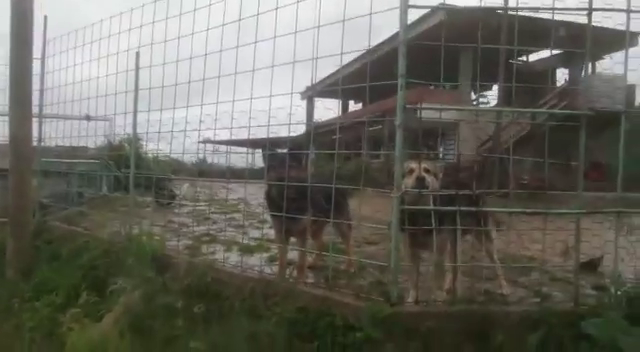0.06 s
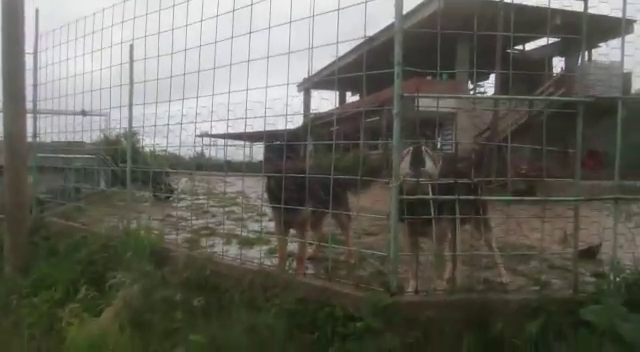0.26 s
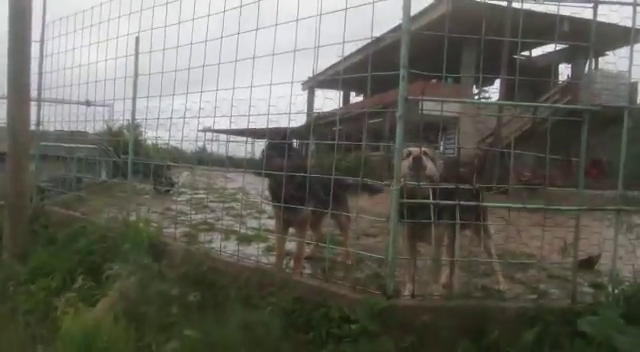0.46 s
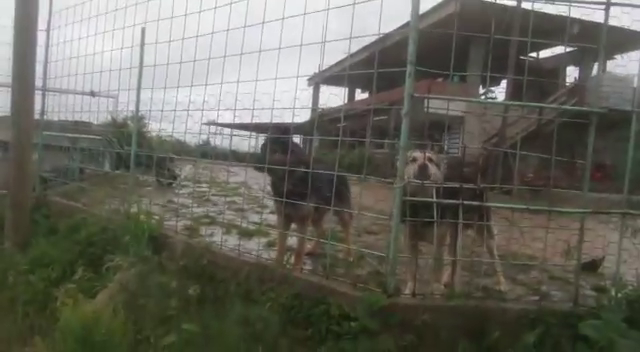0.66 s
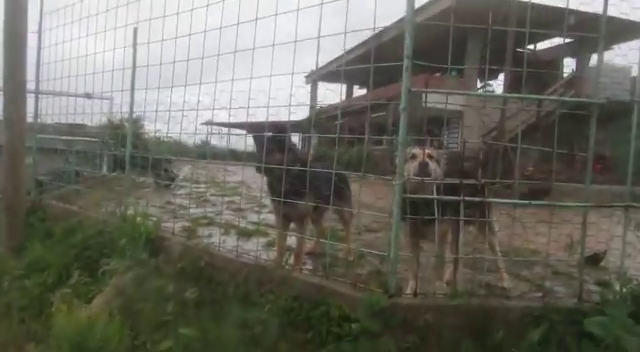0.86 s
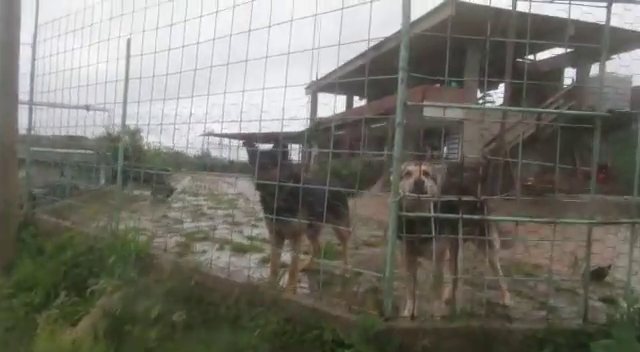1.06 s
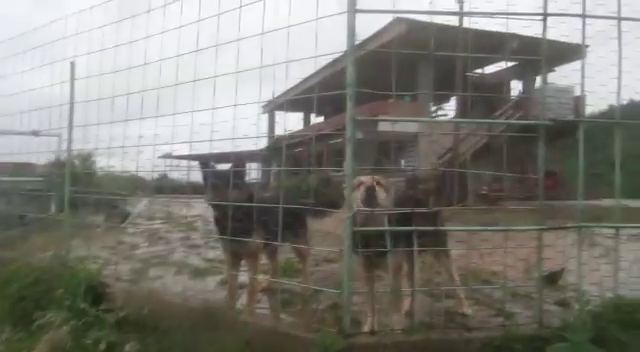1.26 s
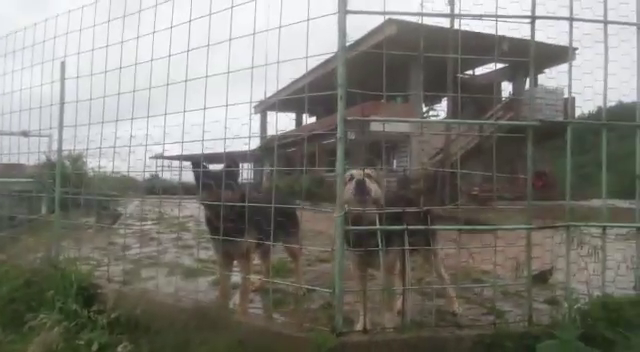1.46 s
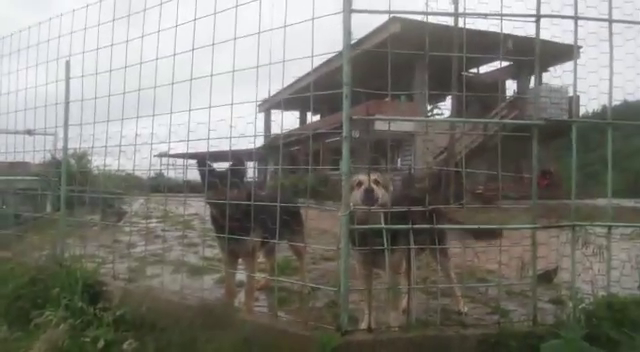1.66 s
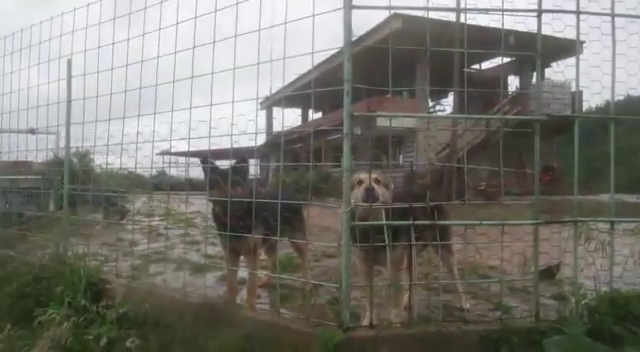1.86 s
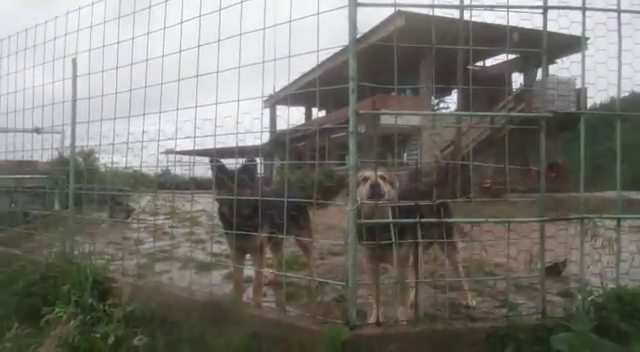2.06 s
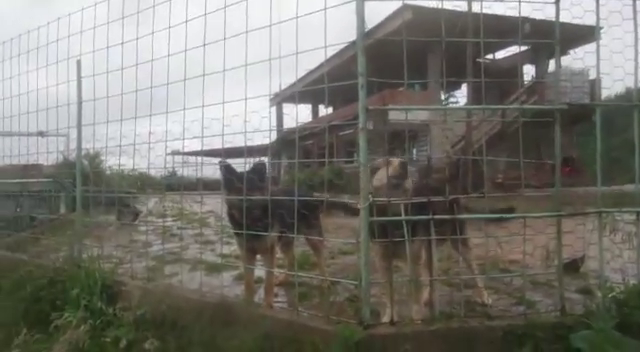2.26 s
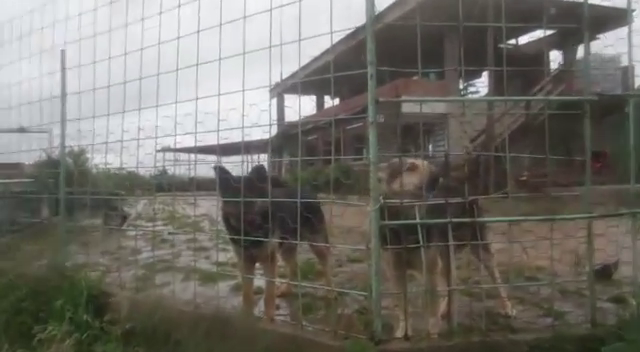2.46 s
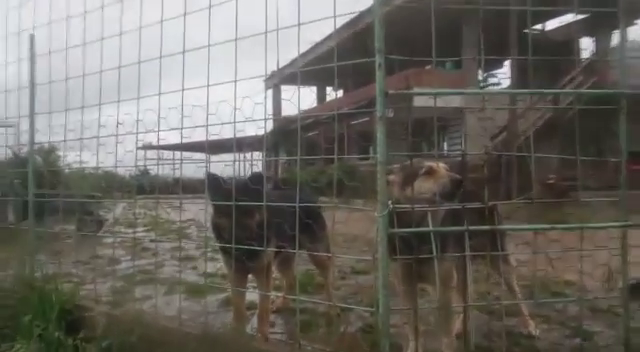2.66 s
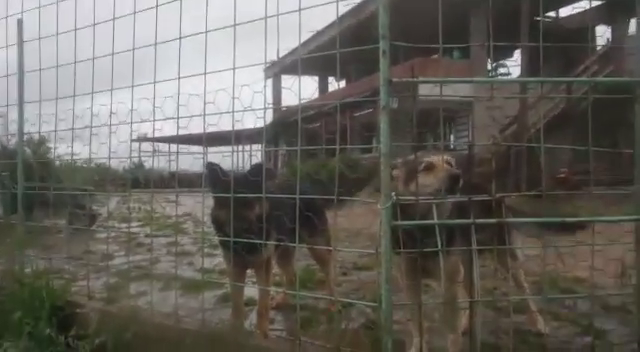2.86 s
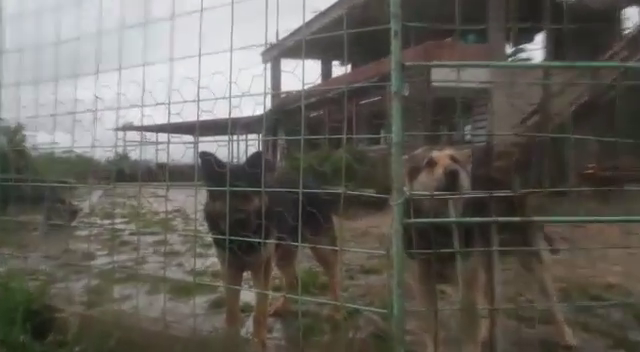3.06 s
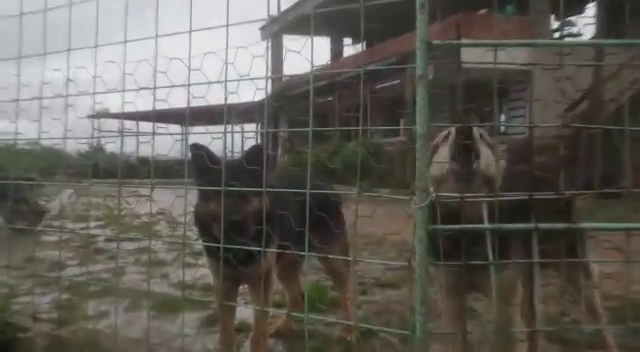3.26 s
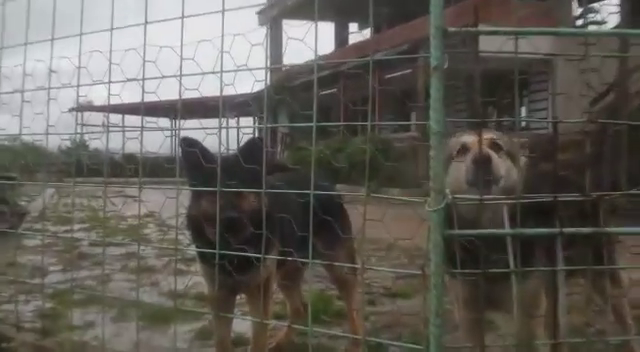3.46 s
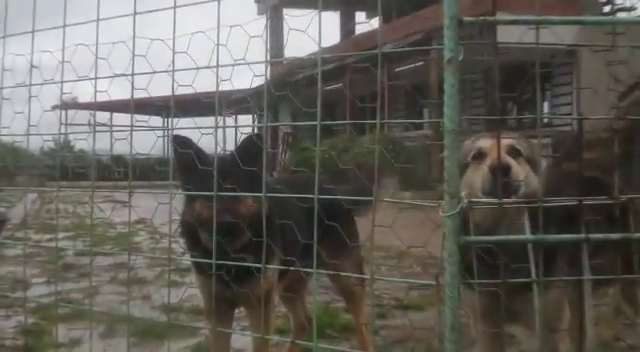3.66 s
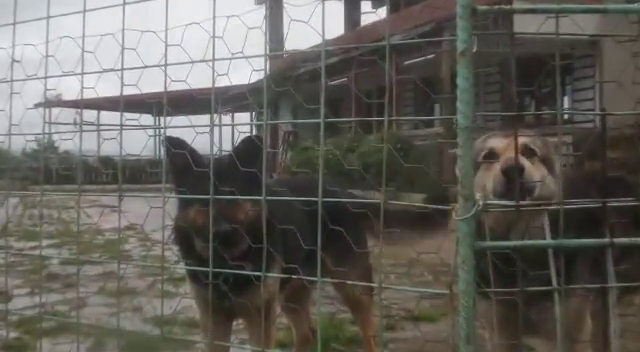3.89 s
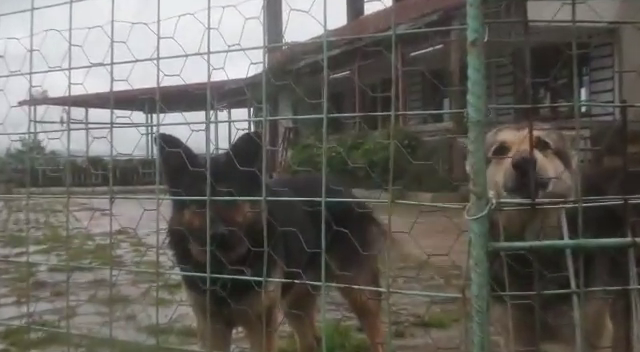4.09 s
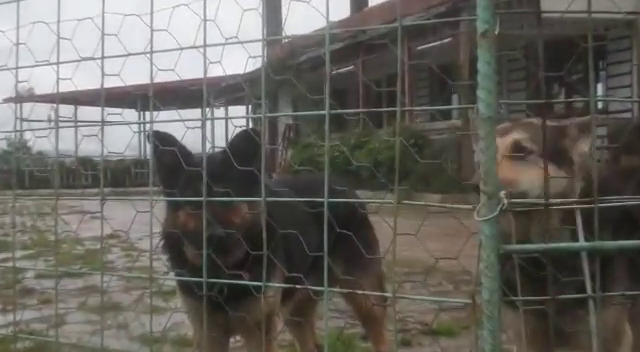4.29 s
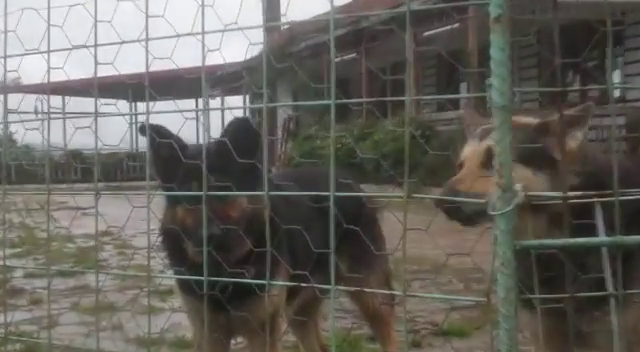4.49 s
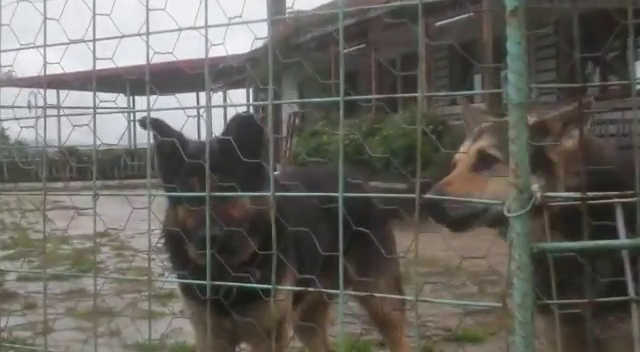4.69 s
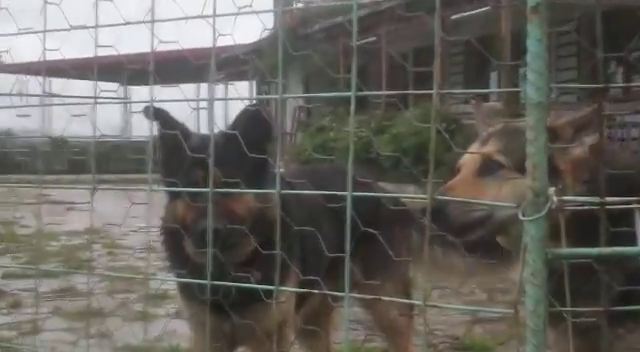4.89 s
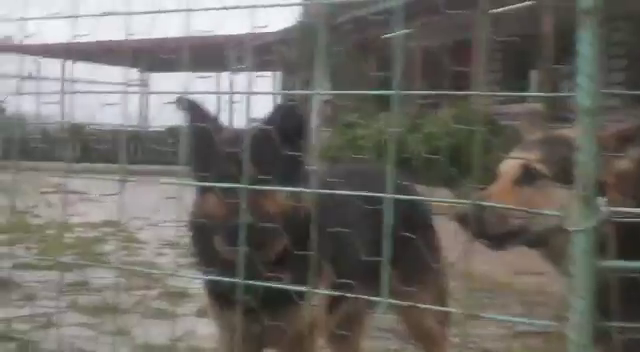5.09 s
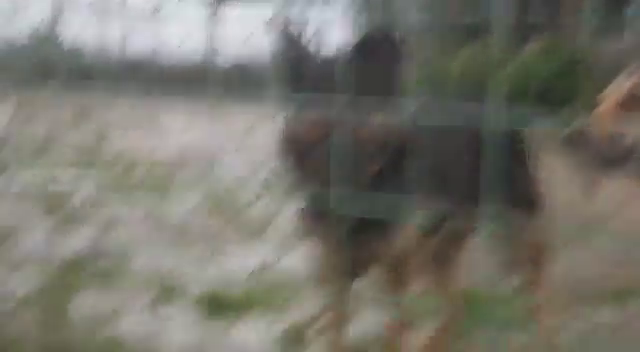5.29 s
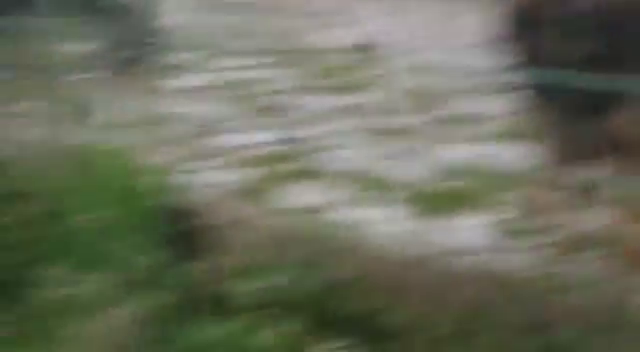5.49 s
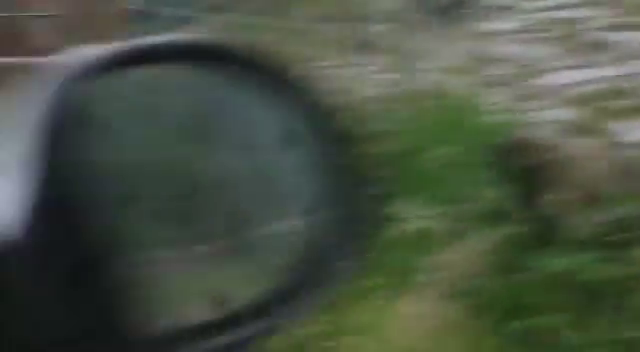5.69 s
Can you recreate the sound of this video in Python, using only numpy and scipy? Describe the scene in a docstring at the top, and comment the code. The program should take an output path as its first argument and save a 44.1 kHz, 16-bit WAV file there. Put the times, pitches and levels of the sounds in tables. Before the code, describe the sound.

A handheld microphone in an open yard catches four isolated hoarse barks from one large dog, loud enough to make the limiter duck. A much quieter diesel rises and falls twice between and beneath them. Then the barking stops, the engine idle grows slightly closer and hissier, a tiny hollow blip sounds, and low wind buffets arrive before a sharp click at the end. The image begins wide and turns mono.

```python
"""A large dog behind a wire fence barks four times: fold tones, ragged throat rings and breath noise; the yard echoes.
Close by a diesel engine idles, is revved twice with thin turbo and belt whistles, and settles to idle as the
listener nears it: sines for its low orders, noise throbbing with the firings for exhaust and hiss.
Small ticks (struck resonances), a hollow blip and wind (lumpy low noise, late gusts) reach the handheld
stereo microphone; its limiter ducks loud peaks and the image folds to mono partway."""
import sys
import numpy as np
from scipy import signal
from scipy.fft import rfft, irfft
from scipy.io import wavfile
from scipy.ndimage import uniform_filter1d

SR = 44100
rng = np.random.default_rng(int(sys.argv[2]) if len(sys.argv) > 2 else 0)


def ratio_of_db(decibels):
    """Turn decibels (scalar or array-like) into linear amplitude factors; 0 dB maps to 1."""
    return 10 ** (np.asarray(decibels, float) / 20)


def dump(signal):
    """Clip the signal to [-1, 1] and save it as 16-bit WAV at the path in sys.argv[1]."""
    limited = np.clip(np.atleast_2d(signal).T, -1, 1)
    pcm = np.round(limited * 32767).astype(np.int16)
    wavfile.write(sys.argv[1], SR, pcm)


N = 253134   # length in samples

# Wind rumble on the microphone: t/s, level/dB
WIND_RUMBLE = [(0, -65), (4.2, -59.5), (4.8, -63), (5.74, -58)]
# Gusts on the microphone: centre t/s, length/s, level/dB
WIND_GUSTS = [(4.932, 0.11, -44.5), (5.15, 0.12, -33.5), (5.3, .1, -34), (5.391, 0.081, -34),
              (5.64, 0.05, -49)]
# Likeness of diffuse sound at left and right: f/Hz, likeness/0-1
LEFT_RIGHT_LIKENESS = [(60, 0.6), (300, 0.86), (1000, 0), (4000, 0), (15000, 0)]
# Small ticks: t/s, burst peak/dB, burst f/Hz, burst t60/s, left over right/dB, knock peak/dB
SMALL_TICKS = [(0.0573, -31, 8000, 0.064, -9, -33.5), (1.046, -36.5, 7480, 0.015, 12, -51),
               (1.1143, -16.5, 8180, 0.0046, 19, -54), (1.2107, -38, 7700, .012, 9, -60),
               (1.995, -45, 8990, 0.023, 29, -41), (2.607, -42, 8200, 0.0087, 0, -65),
               (3.1471, -51, 9170, 0.011, 10, -48), (5.7128, -16, 9937, 0.0046, 23, -16.5)]
# One short hollow blip: t/s, level at onset/dB, f/Hz, t60/s
HOLLOW_BLIP = (4.685, -34, 775, .06)
# Engine speed and loudness: t/s, firing rate/Hz, level/dB
ENGINE_RUN = [(0.0, 25.4, -54.5), (0.46, 33, -50), (0.59, 32.51, -40), (0.67, 37.4, -47), (0.72, 47.7, -46),
              (0.8, 54.4, -43.5), (0.94, 71.2, -39.5), (1.0, 75, -40.5), (1.25, 65.4, -41), (1.58, 52, -44),
              (1.76, 45.4, -52.5), (2.25, 27.8, -53), (2.33, 29, -48), (2.39, 33, -47), (2.46, 45, -47),
              (2.51, 40.4, -50.5), (2.68, 38.6, -51.5), (2.84, 57.5, -47), (2.99, 77.6, -44.5),
              (3.29, 66.1, -39.5), (3.52, 55.5, -47.5), (3.95, 42.6, -54), (4.22, 33.6, -53.5),
              (4.36, 31.64, -47.5), (4.57, 28.8, -44), (5.05, 28.8, -42), (5.74, 29, -41.5)]
# Start and end of the listener's steps up to the engine: t/s
STEPPING_UP_S = [3.71, 4.58]
# Three lowest engine orders over the loudness, by their pitch: f/Hz, level/dB
PIPE_GAIN = [(27, 0), (45, 3), (58, -1.5), (72, 1), (90, -3.5), (115, 1.5), (145, 3.5), (175, -1.5),
             (220, -14.5)]
# Swell of the first order with load and nearness: t/s, level/dB
FIRST_ORDER_SWELL = [(0, 4.5), (.6, -0.5), (.75, -2), (1.0, 7.5), (1.3, 0), (1.8, -3.5), (2.3, -9),
                     (2.7, -7), (2.93, 4), (3.15, 6), (3.6, 0.5), (4.2, -2), (4.4, -5), (4.6, 0.5),
                     (5.74, 8)]
# Higher orders against the loudness, ahead of the silencer: multiple of firing rate, level/dB
UPPER_ORDERS = [(4, -2.5), (5, -8), (6, -5.5), (7, -22), (8, -16.5)]
# Shape of the exhaust noise from afar: f/Hz, relative level per Hz/dB
EXHAUST_AFAR = [(88, -20.5), (150, -17), (177, -6.5), (274, -26.5), (335, -6), (389, -16), (487, -6),
                (552, -14.5), (1470, -26.5), (1820, -27.5), (3000, -44.5), (3900, -69.5), (6600, -120)]
# Shape of the engine block's noise from close by: f/Hz, relative level per Hz/dB
BLOCK_CLOSE = [(90, -48), (150, -19.5), (183, 6.5), (267, -10), (330, -2), (775, -4.5), (1010, -8.5),
               (1380, -8.5), (1600, -17), (3000, -29), (3900, -49), (6600, -90)]
# Shape of the engine hiss: f/Hz, relative level per Hz/dB
HISS_SHAPE = [(1530, 1), (2600, -2.5), (3000, -4), (5040, -7.5), (7420, -3), (8380, -4.5), (11200, -16),
              (15200, -12.5), (16000, -36)]
# Whistles of turbo and belts, one list each: t/s, f/Hz, level before wavering/dB
WHISTLE_GLIDES = [
    [(.78, 6080, -65), (.85, 7700, -58), (.98, 10770, -63)],
    [(2.68, 7320, -70), (2.8, 8100, -64.5), (2.92, 10500, -69), (3.0, 13010, -74)],
    [(1.55, 1680, -81), (1.8, 1700, -69), (2.12, 1680, -95.5)],
    [(4.12, 2180, -62), (4.15, 2270, -69), (4.22, 2190, -70), (4.35, 2228, -62.5), (4.5, 2287, -63.5),
     (4.75, 2414, -68)],
]
# Barks: start t/s, top pitch t/s, folds let go t/s, top pitch f/Hz, bend of the climb,
# level/dB, higher harmonics level/dB, breath level/dB
DOG_BARKS = [(0.356, 0.465, .486, 449.2, 1.11, 5, 5, 3), (1.367, 1.465, 1.49, 418.3, 0.91, 4, 3, 0),
             (2.214, 2.315, 2.329, 424.5, 1.1, 0, 1, -6.5),
             (3.259, 3.361, 3.383, 429.2, 1.05, 5, 0.5, -5.5)]
# Course shared by all barks: share of the time until the folds let go, voice/dB, rasp/dB, breath/dB
BARK_COURSE = [(0, -38.5, -42.5, -64), (.08, -25, -40, -54.5), (.24, -14.5, -22, -40.5),
               (.36, -12, -35, -37.5), (.52, -7, -44, -31), (.68, -7, -38, -35.5),
               (0.852, -5, -30.5, -23.5), (0.999, -3.5, -13, -39.5), (1.035, -5.5, -15, -34.5),
               (1.12, -6.5, -22, -24), (1.24, -11, -22, -47.5), (1.36, -20.5, -36, -42),
               (1.502, -37, -46, -51)]
# Higher harmonics through a bark: share of the time until the folds let go, level/dB
UPPER_COURSE = [(0, -26), (.24, -12), (0.361, -0.5), (.52, -10.5), (.7, -7.5), (0.998, -16), (1.05, -15),
                (1.12, -3.5), (1.25, -15), (1.5, 0)]
# Moments at which the voice cracks: t/s, rasp level/dB
VOICE_CRACKS = [(.457, -4), (1.409, -15), (2.242, -53), (3.305, -23)]
# Throat gain for the fundamental, by voice pitch: pitch f/Hz, level/dB
FUNDAMENTAL_GAIN = [(150, -22), (210, -32), (300, -15.5), (365, -13), (395, -10.5), (425, -5.5), (452, 7.5)]
# Throat gain for the second harmonic, by voice pitch: pitch f/Hz, level/dB
SECOND_GAIN = [(170, -20.5), (250, -6.5), (300, -21.5), (330, -19.5), (350, -10), (370, -1.5), (392, 0),
               (412, 1), (430, -2), (450, -16)]
# Throat and mouth resonances: f/Hz, width/Hz, clean harmonics level/dB, ragged ring level/dB
THROAT_RESONANCES = [(415, 130, 13, -1), (885, 90, 0.5, -4.5), (1188, 180, -11, -20.5),
                     (1295, 72, -1.5, -8.5), (1560, 1000, -16.5, -13.5), (2074, 250, -10, -14.5),
                     (2390, 220, -35, -25)]
# Breath resonances past tongue and teeth: f/Hz, width/Hz, level/dB
TEETH_RESONANCES = [(3310, 480, -15), (4150, 1100, 6), (4570, 250, 6), (5470, 740, 6), (5960, 630, 8),
                    (8000, 1900, 12), (10500, 940, 4), (13830, 2400, 3)]
# Throat tube singing before the folds lock in, one row a bark: t/s, length/s, f/Hz, level/dB
TUBE_HOOTS = [(0.358, 0.05, 416, -24.5), (1.372, 0.03, 423, -18.5), (2.217, 0.055, 408.6, -27),
              (3.259, 0.04, 431, -20)]
# Direction of the yard as the microphone turns: t/s, left over right/dB, left lag/samples
YARD_BEARING = [(0, -2.5, 3.7), (.5, -1.5, 2.74), (1.0, -2.5, 0.72), (1.45, -2, 0.61), (1.9, -4.5, .5)]


def rms_one(x):
    """Scale to rms 1."""
    return x / np.sqrt(np.mean(x ** 2) + 1e-20)


def in_time(rows):
    """Columns of a curve at every sample."""
    s, *columns = np.transpose(rows)
    return [np.interp(np.arange(N) / SR, s, column) for column in columns]


def at_hz(points, hz):
    """Read a level curve on a log frequency axis."""
    points_hz, points_db = np.transpose(points)
    return np.interp(np.log(hz), np.log(points_hz), points_db)


def lowpass(x, order, hz):
    """Butterworth low-pass."""
    return signal.sosfilt(signal.butter(order, hz, fs=SR, output="sos"), x)


def drift(rate_hz):
    """Random wander of rms 1, from noise through two equal low-pass poles."""
    r = np.exp(-2 * np.pi * rate_hz / SR)
    wander = signal.lfilter([1], [1, -2 * r, r * r], rng.standard_normal(N + SR))
    return rms_one(wander[SR:])   # the first second lets the filter settle


def resonate(x, hz, width_hz):
    """Two-pole resonance with gain 1 on top."""
    r = np.exp(-np.pi * width_hz / SR)
    zeros = np.array([1, 0, -1]) * (1 - r * r) / 2
    poles = [1, -2 * r * np.cos(2 * np.pi * hz / SR), r * r]
    return signal.lfilter(zeros, poles, x)


def coloured(spectrum, floor_db=-90):
    """Diffuse stereo noise of a given spectrum: partly alike in the bass, unrelated in the treble; mid at rms 1."""
    hz = np.maximum(np.arange(N // 2 + 1) * SR / N, 1)
    mid, side = rfft(rng.standard_normal((2, N)))
    alike = np.clip(at_hz(LEFT_RIGHT_LIKENESS, hz), 0, 1)
    both = np.sqrt(1 + alike) * mid + np.sqrt(1 - alike) * side * np.array([[1], [-1]])
    out = irfft(both * ratio_of_db(np.maximum(at_hz(spectrum, hz), floor_db)), N)
    return out / np.sqrt(np.mean(out.mean(0) ** 2))


def wind():
    """Wind at the microphone: lumpy low noise, swelling in bell-shaped gusts."""
    lows = coloured([(15, -35), (50, 3.5), (120, 0.5), (260, 3.5), (330, -6), (800, -61.0), (2500, -81)])
    t = np.arange(N) / SR
    gusts = sum(ratio_of_db(db) * np.exp(-(2 * (t - s) / length) ** 2) for s, length, db in WIND_GUSTS)
    rumble = ratio_of_db(in_time(WIND_RUMBLE)[0])
    return (rumble + gusts) * ratio_of_db(2.45 * drift(14.7)) * lows


def ticks():
    """Each tick is a snap with a bright burst dying after it, and a duller knock."""
    out = np.zeros((2, N + SR))
    t = np.arange(int(.06 * SR)) / SR
    snap = 1.0 * (t == 0)
    for s, peak_db, hz, t60, pan_db, knock_db in SMALL_TICKS:
        shake = snap + 0.29 * rng.standard_normal(len(t)) * ratio_of_db(-60 * t / t60)
        burst = resonate(shake, hz, .7 * hz)
        knock = resonate(snap, 1070, 490)
        both = ratio_of_db(peak_db) * burst / np.max(np.abs(burst)) + ratio_of_db(knock_db) * knock / np.max(knock)
        sides = ratio_of_db(np.array([[.5], [-.5]]) * pan_db)
        at = int(s * SR)
        out[:, at:at + len(t)] += both * sides / sides.mean()
    return out[:, :N]


def blip():
    """A dying sine with a soft onset, alike on both channels."""
    s, level_db, hz, t60 = HOLLOW_BLIP
    t = np.arange(int(.06 * SR)) / SR
    onset = np.minimum(t / 0.0012, 1)
    out = np.zeros(N)
    at = int(s * SR)
    out[at:at + len(t)] = ratio_of_db(level_db - 60 * t / t60) * np.sin(2 * np.pi * hz * t) * onset
    return out


def whistle(rows, smear=0.0115):
    """A thin breathy line of turbo or belts: a glide smeared by fast wavering, coming and going."""
    hz, db = in_time(rows)
    t = np.arange(N) / SR
    sounding = (t >= rows[0][0]) & (t <= rows[-1][0])
    turns = 2 * np.pi * np.cumsum(hz * (1 + smear * drift(66))) / SR
    return np.sqrt(2) * ratio_of_db(db) * (0.64 + drift(130)) * np.sin(turns) * sounding


def engine_orders(firing, loud_db, angle):
    """Multiples of the firing rate as sines; the silencer takes out the high ones."""
    silencer_hz = 209
    levels = [(k, loud_db + at_hz(PIPE_GAIN, k * firing)) for k in range(1, 4)]
    levels[0] = (1, levels[0][1] + in_time(FIRST_ORDER_SWELL)[0])
    for k, db in UPPER_ORDERS:
        loss_db = 10 * np.log10(1 + (k * firing / silencer_hz) ** 8)
        levels.append((k, loud_db + db - loss_db))
    return sum(np.sqrt(2) * ratio_of_db(db + 1.8 * drift(26)) * np.sin(k * (angle + 0.3944 * k)) for k, db in levels)


def engine_noise(loud_db, angle):
    """Exhaust noise and hiss swell with every firing; the block takes over from the exhaust close by."""
    hiss_db, hiss_follows = -11, 1.05   # hiss over a loudness of -45 dB; share of the loudness swing
    near = np.interp(np.arange(N) / SR, STEPPING_UP_S, [0, 1])
    body = np.sqrt(1 - near) * coloured(EXHAUST_AFAR) + np.sqrt(near) * coloured(BLOCK_CLOSE)
    exhaust = ratio_of_db(loud_db + drift(6.3)) * body * (1 + 0.11 * np.cos(angle))
    hiss_level = ratio_of_db(hiss_db - 45 + hiss_follows * (loud_db + 45))
    hiss = hiss_level * coloured(HISS_SHAPE) * (1 + 0.093 * np.cos(angle))
    return exhaust + hiss


def engine():
    """One slightly uneven firing cycle drives both the tonal orders and the throbbing noise."""
    firing, loud_db = in_time(ENGINE_RUN)
    angle = 2 * np.pi * np.cumsum(firing * (1 + .012 * drift(10))) / SR
    return engine_orders(firing, loud_db, angle), engine_noise(loud_db, angle)


def yard(x):
    """Sparse dull echoes from walls and roofs, mostly alike at left and right."""
    first_s, t60_s = .05, .33
    level_db, wall_hz = -34, 6000   # level ahead of the make-up for the wall cut
    t = np.arange(int(.6 * SR)) / SR
    shared, own = rng.standard_normal(len(t)), rng.standard_normal((2, len(t)))
    sparse = (rng.random(len(t)) < .04) * (t > first_s)
    hits = (shared + 0.222 * own) * sparse * ratio_of_db(-60 * t / t60_s)
    hits = lowpass(hits, 1, wall_hz)
    hits = ratio_of_db(level_db) * hits / np.sqrt(np.sum(hits ** 2) / 2)
    hits = hits * np.sqrt(SR / 4 / wall_hz)
    return signal.fftconvolve(x[None], hits, axes=1)[:, :N]


def tube_hoot(s, length, hz, db, second_db=-6, third_db=-12):
    """A short unsteady hoot at the throat tube's pitch, its overtones growing."""
    t = np.arange(int(length * SR)) / SR
    wobble = rms_one(uniform_filter1d(rng.standard_normal(len(t)), size=200))
    angle = 2 * np.pi * np.cumsum(hz * (1 + 0.051 * wobble)) / SR
    swell = np.minimum(t / 0.0062, 1) * np.minimum((length - t) / 0.0065, 1)
    overtones = (ratio_of_db(second_db) * np.sin(2 * angle) + ratio_of_db(third_db) * np.sin(3 * angle)) * t / length
    out = np.zeros(N)
    at = int(s * SR)
    out[at:at + len(t)] = np.sqrt(2) * ratio_of_db(db) * swell * (np.sin(angle) + overtones)
    return out


def fold_pitch(t, start, top_s, free_s, top_hz, bend):
    """Pitch of the folds in Hz: it climbs, sags, then drops toward rest once they let go."""
    start_hz, sag_hz_per_s, rest_hz, let_go_s = 253.6, 600, 169.1, .021
    climb = np.clip((t - start) / (top_s - start), 0, 1) ** bend
    held = start_hz + (top_hz - start_hz) * climb
    held = held - sag_hz_per_s * np.clip(t - top_s, 0, free_s - top_s)
    return rest_hz + (held - rest_hz) * np.exp(-np.maximum(t - free_s, 0) / let_go_s)


def clean_voice(pitch, turns, upper_db, a, b):
    """Regular fold vibration: harmonics 1 to 9 weighted by the throat."""
    orders = np.arange(3, 10)[:, None]
    # a harmonic swells while it crosses a throat resonance
    shape = sum(ratio_of_db(db) / (1 + (2 * (orders * pitch - hz) / width) ** 2)
                for hz, width, db, _ in THROAT_RESONANCES)
    shape = shape * ratio_of_db(-4.5 * (orders - 2))   # each higher harmonic is weaker
    shape = shape * ratio_of_db(3.0 * np.array([drift(35)[a:b] for _ in orders]))   # each one flickers
    upper = np.sum(shape * np.sin(2 * np.pi * orders * turns + orders), axis=0)
    first = ratio_of_db(at_hz(FUNDAMENTAL_GAIN, pitch)) * np.sin(2 * np.pi * turns)
    second = ratio_of_db(at_hz(SECOND_GAIN, pitch)) * np.sin(4 * np.pi * turns + 1)
    return first + second + ratio_of_db(upper_db) * upper


def ragged_throat(closures):
    """Uneven fold closures and noise ring each throat resonance."""
    n = len(closures)
    ragged = closures + 0.42 * rng.standard_normal(n)
    rings = [ratio_of_db(db) * rms_one(resonate(resonate(ragged, hz, width), hz, 2 * width))
             for hz, width, _, db in THROAT_RESONANCES]
    rings[0] = rings[0] * ratio_of_db(-70 * np.arange(n) / SR)   # the jaw opens and the lowest ring fades
    return sum(rings[::2]) - sum(rings[1::2])   # neighbours in opposite sense


def breath_noise(turns, closures, a, b):
    """Air gated by each fold cycle whistles unevenly through the gaps of tongue and teeth; rms 1."""
    air = rng.standard_normal(b - a) * (1 + .7 * np.cos(2 * np.pi * turns)) + 5.0 * closures
    return rms_one(sum(ratio_of_db(db + 3.0 * drift(20)[a:b]) * rms_one(resonate(resonate(air, hz, width), hz, width))
                       for hz, width, db in TEETH_RESONANCES))


def bark(start, top_s, free_s, top_hz, bend, level_db, bright_db, air_db):
    """Clean fold vibration and ragged throat rings share a low-pass; gated breath lies on top."""
    share, *curves = np.transpose(BARK_COURSE)
    a, b = int(start * SR), int((start + share[-1] * (free_s - start)) * SR)
    t = np.arange(a, b) / SR
    progress = (t - start) / (free_s - start)
    voice_db, rasp_db, breath_db = [level_db + np.interp(progress, share, c) for c in curves]
    upper_db = bright_db + np.interp(progress, *np.transpose(UPPER_COURSE))
    pitch = fold_pitch(t, start, top_s, free_s, top_hz, bend)
    wobble = rms_one(uniform_filter1d(rng.standard_normal(b - a), size=150))
    turns = np.cumsum(pitch * (1 + .012 * wobble)) / SR
    # some closures are skipped, the rest vary in strength
    kept = rng.random(b - a) < 0.76
    closures = np.diff(np.floor(turns), prepend=0) * kept * rng.normal(1, .5, b - a)
    cracks = sum(ratio_of_db(db) * np.exp(-((t - s) / .008) ** 2) for s, db in VOICE_CRACKS)
    rasp = (ratio_of_db(rasp_db) + cracks) * ragged_throat(closures)
    voice = np.sqrt(2) * ratio_of_db(voice_db) * clean_voice(pitch, turns, upper_db, a, b)
    throat = lowpass(rasp - voice, 6, 2320)   # little of the throat's sound passes above this
    breath = ratio_of_db(breath_db + air_db) * breath_noise(turns, closures, a, b)
    fade_out = np.minimum(np.arange(b - a)[::-1] / (.008 * SR), 1)
    out = np.zeros(N)
    out[a:b] = fade_out * (throat + breath)
    return out


def place(x, split_hz=2500, treble_pan_db=3.5):
    """Level and arrival differences between the two ports, with sideways scatter off the fence."""
    scatter_s, scatter_db, scatter_from_hz = 0.0056, -6, 900   # decay time, level, lowest pitch
    pan_db, lag = in_time(YARD_BEARING)
    lows = lowpass(x, 1, split_hz)
    lean = np.array([[.5], [-.5]])
    # the bearing's level difference goes to the lows, a fixed one to the treble
    left, right = lows * ratio_of_db(lean * pan_db) + (x - lows) * ratio_of_db(lean * treble_pan_db)
    left = np.interp(np.arange(N) - lag, np.arange(N), left)
    # sound from the sides pushes the two ports in opposite sense
    thin = signal.sosfilt(signal.butter(2, scatter_from_hz, "high", fs=SR, output="sos"), x)
    paths = rng.standard_normal(1000) * np.exp(-np.arange(1000) / SR / scatter_s)
    paths = paths / np.sqrt(np.sum(paths ** 2))
    scatter = ratio_of_db(scatter_db) * signal.fftconvolve(thin, paths)[:N]
    return np.array([left + scatter, right - scatter])


def limiter(x):
    """Gain drops by as much as the peaks pass the ceiling and recovers at a steady rate."""
    ceiling_db, release_db_per_s, attack_s = -2.2, 100, 0.0021
    recovery_db = release_db_per_s * np.arange(N) / SR
    over_db = np.maximum(20 * np.log10(np.abs(x).max(0) + 1e-9) - ceiling_db, 0)
    over_db = np.maximum.accumulate(over_db + recovery_db) - recovery_db
    r = np.exp(-1 / (attack_s * SR))
    return x * ratio_of_db(-signal.lfilter([1 - r], [1, -r], over_db))


def scene():
    """Dog, engine tones and whistles lie on the yard's bearing; echo, engine noise, ticks and wind are added."""
    dog = sum(bark(*row) for row in DOG_BARKS) + sum(tube_hoot(*row) for row in TUBE_HOOTS)
    tones, noise = engine()
    direct = dog + tones + sum(whistle(rows) for rows in WHISTLE_GLIDES)
    return place(direct) + yard(dog) + noise + ticks() + blip() + wind()


def band_limit(x):
    """A steep low-pass at the top of the band."""
    return signal.sosfilt(signal.butter(12, 16900, fs=SR, output="sos"), x)


def record(dry):
    """The stereo image folds to mono; the limiter acts, the input stage rounds peaks and the top is cut."""
    mono_from_s, peak_top = 1.92, .95
    wide = np.clip((mono_from_s - np.arange(N) / SR) / 0.025, 0, 1)
    mid, side = dry.mean(0), wide * (dry[0] - dry[1]) / 2
    both = limiter(np.array([mid + side, mid - side]))
    both = both / (1 + np.abs(both / peak_top) ** 6) ** (1 / 6)
    both = signal.sosfilt(signal.ellip(10, .5, 40, 15800, fs=SR, output="sos"), both)
    return band_limit(both)


dry = scene()
out = record(dry)
dump(out)
```